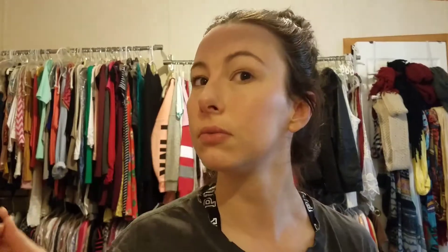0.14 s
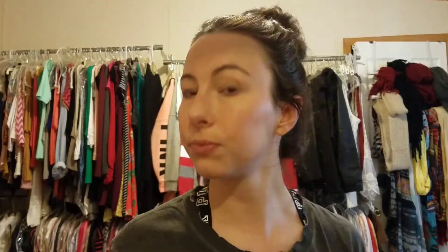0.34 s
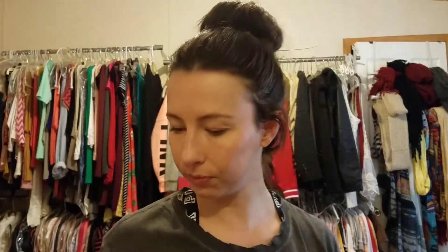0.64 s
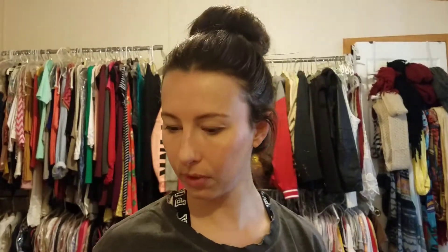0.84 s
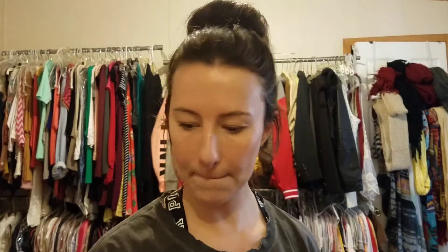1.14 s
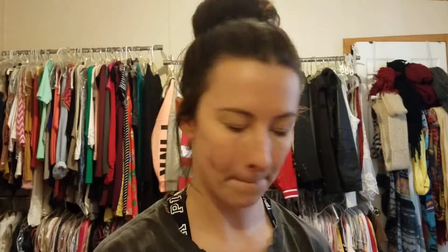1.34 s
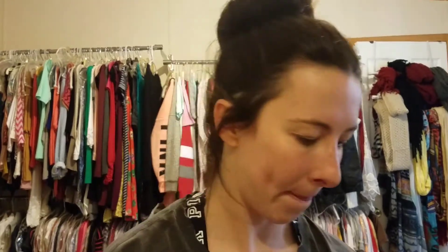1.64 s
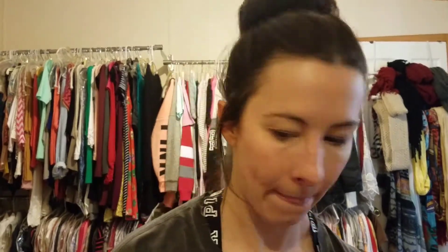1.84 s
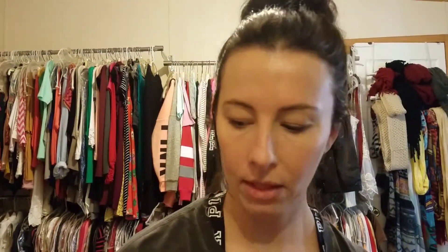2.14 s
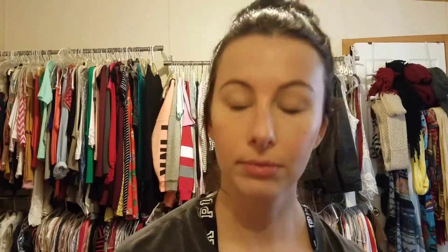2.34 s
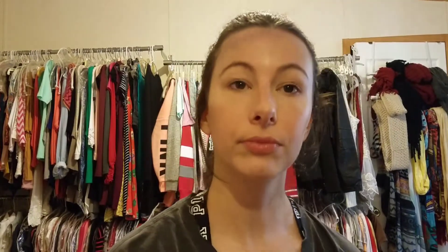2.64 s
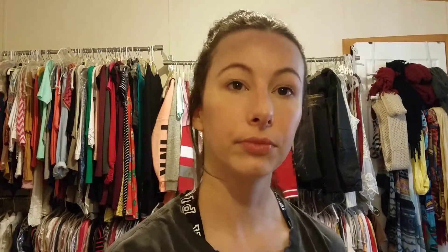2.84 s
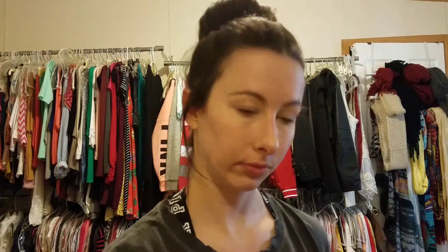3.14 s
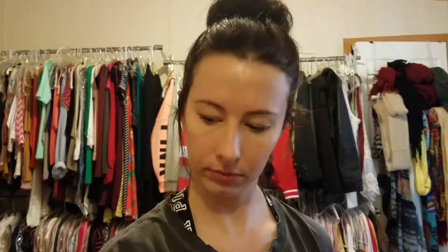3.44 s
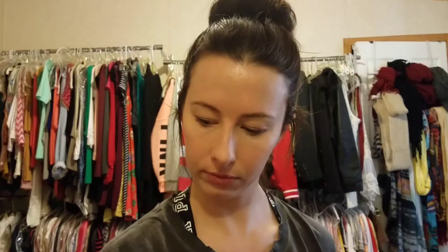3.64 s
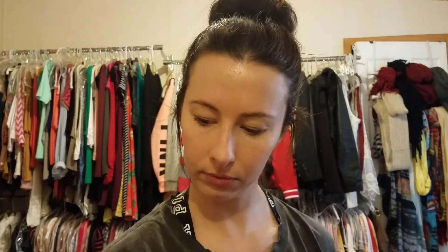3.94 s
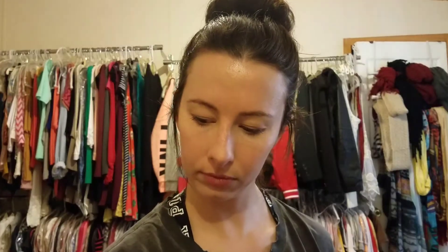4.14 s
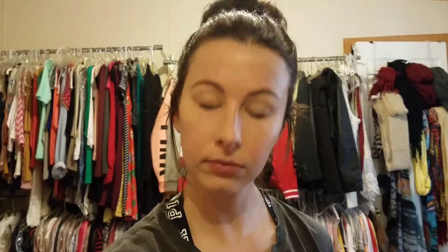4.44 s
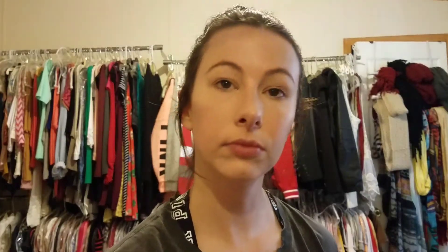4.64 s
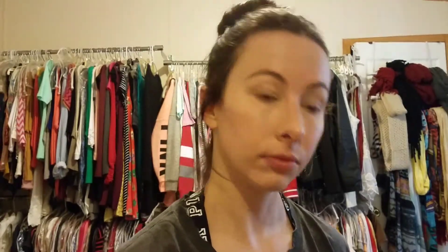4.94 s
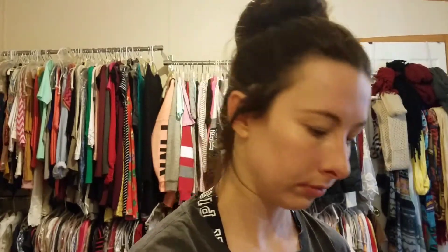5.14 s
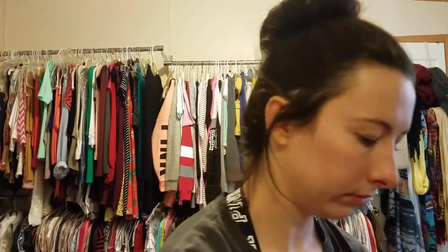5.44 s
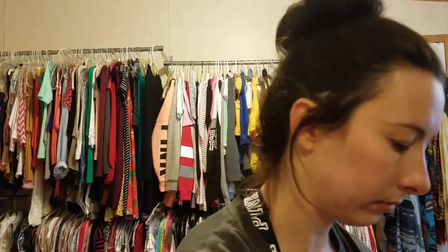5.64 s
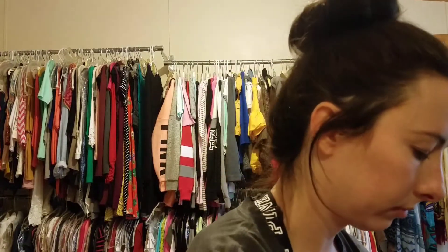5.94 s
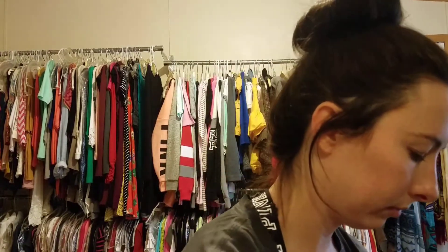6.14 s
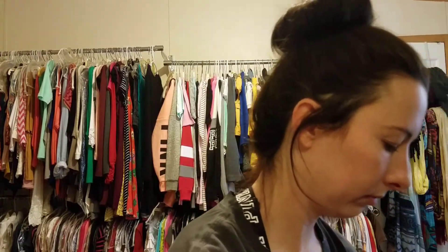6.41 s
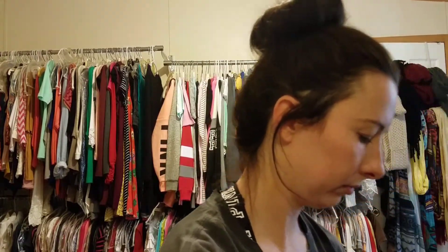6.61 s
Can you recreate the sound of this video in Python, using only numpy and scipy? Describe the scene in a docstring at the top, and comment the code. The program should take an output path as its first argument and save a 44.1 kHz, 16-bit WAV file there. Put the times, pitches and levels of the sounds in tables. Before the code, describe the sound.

Light plastic clicks and soft counter thuds over faint room hiss, then a tap, a short squeaking slide and a burst of hollow knocks.

```python
"""Low noise and hiss of a room lined with clothes come first, with hands rumbling on a wooden counter.
Small plastic make-up cases and a brush follow on the left: lids click, cases thud and slide.
After five seconds the handling moves right: a hard case taps, a slide squeaks, a hollow box is knocked.
Blows ring decaying modes; slides are dense grains or friction noise; rumble and hiss are filtered noise.
Two ports hear the handling by delay, level and shadow; the blows and slides also reverberate."""
import sys
import numpy as np
from scipy import signal
from scipy.io import wavfile

SR = 44100
rng = np.random.default_rng(int(sys.argv[2]) if len(sys.argv) > 2 else 0)


def unload_audio(sound):
    """Save the sound as a 16-bit wav file, at the path given as the first command line argument."""
    columns = np.transpose(np.atleast_2d(sound))
    # keep every value between -1 and 1, then stretch to whole-number steps
    steps = np.round(np.clip(columns, -1, 1) * 32767)
    wavfile.write(sys.argv[1], SR, steps.astype(np.int16))


N = 298557  # samples


def from_db(db):
    """Decibel law: amplitude gain of a level in dB."""
    return 10 ** (np.asarray(db) / 20)


def rms_one(x):
    """Power normalisation: scales a signal to rms 1."""
    return x / np.sqrt(np.mean(x ** 2) + 1e-20)


def in_time(rows):
    """Linear interpolation: columns of a time curve, one value per sample."""
    s, *columns = np.transpose(rows)
    return [np.interp(np.arange(N) / SR, s, c) for c in columns]


def at_hz(points, hz):
    """Logarithmic pitch: reads a spectrum on a log-frequency axis."""
    table = np.array(points)
    return np.interp(np.log(hz), np.log(table[:, 0]), table[:, 1])


def drift(rate_hz):
    """Low-passed chance: white noise through a double pole at the given rate, spread 1."""
    step = 40  # samples between drawn values
    pole = np.exp(-2 * np.pi * rate_hz * step / SR)
    white = rng.standard_normal(N // step + 2002)
    slow = signal.lfilter([1], [1, -2 * pole, pole * pole], white)[2000:]  # past the start-up
    return np.interp(np.arange(N) / step, np.arange(len(slow)), rms_one(slow))


def bands(low_hz, step=0.5916):
    """Band analysis: band-passes, step octaves wide, with their centres."""
    edges = low_hz * 2 ** np.arange(0, np.log2(.42 * SR / low_hz), step)
    return [(np.sqrt(a * b), signal.butter(2, [a, b], "band", fs=SR, output="sos"))
            for a, b in zip(edges, edges[1:])]


def train(times, db):
    """Impulsive excitation: single-sample clicks."""
    out = np.zeros(N)
    np.add.at(out, (np.asarray(times) * SR).astype(int), from_db(db))
    return out


def ring(clicks, hz, t60):
    """Damped resonance: a unit click starts a wave of height 1; zeros block 0 Hz and the top limit."""
    radius = from_db(-60 / (t60 * SR))
    angle = 2 * np.pi * hz / SR
    return signal.lfilter([.5, 0, -.5], [1, -2 * radius * np.cos(angle), radius * radius], clicks + 1e-18)


def near(hz, centre_hz, reach_oct):
    """Selective excitation: a contact favours modes around one pitch; 6 dB down at the reach."""
    return -6 * (np.log2(hz / centre_hz) / reach_oct) ** 2


TRAVEL_S = .0012  # from hands to ports


def strike(times, modes, db_of_mode, spread_db, contact_s):
    """Modal superposition: each blow rings all modes, with chance strengths and moments of contact."""
    shape = (len(times), len(modes))
    chance = spread_db * rng.standard_normal(shape)
    late = TRAVEL_S + contact_s * rng.random(shape)
    out = 0
    for k, (hz, db, t60) in enumerate(modes):
        clicks = train(times + late[:, k], db + db_of_mode(hz) + chance[:, k])
        out = out + (-1) ** k * ring(clicks, hz, t60)  # alternate modes are inverted
    return out


SLIDE_SWING_DB = 20  # rise and fall are the times over which the level moves this much


def swell(t, s, db, rise_s, fall_s):
    """Exponential growth and decay: a stroke's gain climbs, then falls, straight in dB."""
    return from_db(db - SLIDE_SWING_DB * np.maximum((s - t) / rise_s, (t - s) / fall_s))


# spectrum of the steady noise: (frequency [Hz], relative density [dB per Hz])
HISS_SPECTRUM = [(25, -15.5), (62, -9.5), (85, -7.5), (120, -4), (160, -5), (300, -13), (650, -14.5),
                 (1500, -14.5), (2250, -12), (3300, -19.5), (6300, -25), (9800, -30.5), (12800, -26.5),
                 (15500, -23)]
# coherence of the two channels: (frequency [Hz], left-right likeness [-1 to 1])
HISS_LIKENESS = [(60, 0.79), (180, 0.46), (550, 0.7), (1650, 0.23), (4970, -0.026), (15000, -0.1)]
# balance of the steady noise: (frequency [Hz], left minus right [dB])
HISS_BALANCE = [(60, 0), (240, -4), (950, 0.5), (3770, 1.5), (15000, 1)]
HISS_DB = -66.5  # rms over both channels


def hiss():
    """Interchannel coherence: steady noise, mostly alike in the bass and nearly unrelated in the treble."""
    out = 0
    white = rng.standard_normal((2, 2, N))  # neighbouring bands get unrelated noise
    for k, (hz, sos) in enumerate(bands(21.44, step=1 / 3)):
        mid, side = signal.sosfilt(sos, white[k % 2])
        alike = np.clip(at_hz(HISS_LIKENESS, hz), -1, 1)
        lean = from_db(at_hz(HISS_BALANCE, hz) / 2 * np.array([[1], [-1]]))
        pair = np.sqrt(1 + alike) * mid + np.sqrt(1 - alike) * side * [[1], [-1]]
        level = from_db(at_hz(HISS_SPECTRUM, hz) + 0.22 * drift(8.5))
        out = out + lean * level * pair
    return from_db(HISS_DB) * rms_one(out)


# hands and sleeves on the counter: (time [s], rumble level [dB])
HANDLING_LEVEL = [(0.0, -73), (0.87, -63), (1.02, -69), (1.81, -65), (2.09, -67), (2.71, -61),
                  (3.04, -67.5), (3.5, -59.5), (3.71, -75.5), (3.96, -65.5), (4.41, -61), (4.6, -66.5),
                  (5.41, -68), (5.6, -60.5), (5.79, -72.5), (6.26, -69), (6.47, -65), (6.77, -75)]
# spectrum of the rumble: (frequency [Hz], relative density [dB per Hz])
RUMBLE_SPECTRUM = [(26, -40), (45, -9.5), (62, -2), (130, 0), (166, -4), (292, -4), (440, -12.5), (519, -4),
                   (840, -21.5), (1200, -11.5), (1560, -62), (2640, -120)]
LUMPS_DB = 1.6  # spread of each of the two drifts


def handling():
    """Modulated band noise: low and lumpy, neighbouring bands swelling partly together."""
    out = 0
    together = drift(6.5)
    white = rng.standard_normal((2, N))
    for k, (hz, sos) in enumerate(bands(43.8)[:10]):
        lumps_db = LUMPS_DB * (together + drift(12))
        out = out + from_db(at_hz(RUMBLE_SPECTRUM, hz) + lumps_db) * signal.sosfilt(sos, white[k % 2])
    return from_db(in_time(HANDLING_LEVEL)[0]) * rms_one(out)


# plastic clicks: (time [s], relative level [dB], pitch most excited [Hz], crack relative to click [dB])
CASE_CLICKS = [(0.6449, -58, 2140, -29), (0.9597, -59.5, 2340, -24), (1.1552, -39.5, 2850, -9),
               (1.2282, -34.5, 1720, -14), (1.2394, -31, 2900, -6), (1.5715, -40, 2780, -2.5),
               (1.7552, -52, 2410, -8.5), (1.9227, -44.5, 2020, -15), (2.1188, -51.5, 1630, -8),
               (2.277, -65.5, 2240, 8), (2.33, -53.5, 2420, -10), (2.4304, -58, 2130, -18),
               (2.4684, -47, 2440, -24), (2.572, -57, 2160, -13), (2.6392, -47.5, 4640, -26),
               (2.731, -50.5, 1310, -20), (2.8135, -56.5, 6150, -7), (2.8469, -54, 3000, -12),
               (3.2064, -48.5, 2160, -12), (3.2226, -54, 2670, -24), (3.4369, -42, 2710, -29),
               (3.4478, -37, 4680, -32), (3.4536, -37, 3170, -28), (3.4934, -64, 4520, -21),
               (3.908, -41, 2770, -6.5), (3.9588, -38.5, 2320, -31), (3.9674, -41, 2580, -19),
               (3.9785, -29.5, 2920, -11), (4.1896, -59, 4200, -7), (4.33, -56, 2740, -19),
               (4.343, -56, 3030, -19), (4.3795, -52, 1980, -14), (4.4006, -53, 2950, -27),
               (4.4317, -52, 2100, -23), (4.5391, -60, 2600, -20), (4.575, -43.5, 2480, -33),
               (5.4969, -60, 3650, -20), (5.5149, -53, 1780, -23), (5.5815, -48, 1410, -14),
               (5.8146, -50, 1290, -28), (6.247, -55, 3000, -9)]
# ringing of the plastic cases: (frequency [Hz], relative level [dB], t60 before the cap [s])
CASE_MODES = [(1220, 10, 0.012), (1540, 3, 0.027), (1817, 9, 0.0053), (2310, 4.5, 0.011),
              (2682, 2.5, 0.018), (3265, 10, 0.005), (3730, 9.5, 0.0067), (4040, 9.5, 0.0085),
              (4730, 7.5, 0.0092), (5710, 7.5, 0.0063), (6740, 4, 0.036), (7430, 4, 0.045),
              (7500, -18, 0.036)]
CASE_LONGEST_T60_S, CASE_CONTACT_S = .022, .0008
CASE_REACH_OCT, CASE_SPREAD_DB = 0.73, 2
CASE_DB, CRACK_DB = -6, 3  # added to every ringing and every crack
CRACK_S = 0.0072  # time in which the crack's amplitude falls to 1/e
CRACK_LOW_HZ, CRACK_HIGH_HZ = 5950, 8400


def cases():
    """Modal decay plus a noise burst: plastic lids ring in short modes with a bright crack."""
    s, db, hz, crack_db = np.transpose(CASE_CLICKS)
    modes = [(f, level, min(t60, CASE_LONGEST_T60_S)) for f, level, t60 in CASE_MODES]
    body = strike(s, modes, lambda f: db + CASE_DB + near(f, hz, CASE_REACH_OCT),
                  CASE_SPREAD_DB, CASE_CONTACT_S)
    fade = np.exp(-1 / (CRACK_S * SR))
    onsets = train(s + TRAVEL_S, db + crack_db + CRACK_DB)
    burst = rng.choice([-1, 1], N) * signal.lfilter([1], [1, -fade], onsets + 1e-18)
    bright = signal.butter(1, (CRACK_LOW_HZ, CRACK_HIGH_HZ), "band", fs=SR, output="sos")
    return body + signal.sosfilt(bright, burst)


# two small ticks straight ahead: (time [s], level added to the modes [dB])
TICK_BLOWS = [(0.826, -70), (3.008, -66.5)]
# their ringing: (frequency [Hz], relative level [dB], t60 [s])
TICK_MODES = [(1116, 18.5, 0.025), (1560, -14, 0.013), (2250, 10, 0.044)]


def ticks():
    """Modal decay: two faint ticks ahead, each ringing three modes."""
    s, db = np.transpose(TICK_BLOWS)
    return strike(s, TICK_MODES, lambda f: db, 0.91, CASE_CONTACT_S)


# thuds, on the counter and, from 6.44 s, on the hollow box: (time [s], relative level [dB], pitch most excited
# [Hz])
COUNTER_THUDS = [(1.228, -26.5, 506), (1.24, -26.5, 516), (1.26, -39, 526), (1.285, -41, 480),
                 (1.487, -53, 145), (1.636, -51, 230), (1.754, -48.5, 480), (1.767, -45, 299),
                 (1.778, -44, 199), (1.921, -50, 428), (2.116, -45, 500), (2.131, -52.5, 375),
                 (2.555, -50, 213), (2.62, -59, 113), (2.689, -44, 123), (2.847, -43, 273),
                 (3.361, -33, 114), (3.376, -38, 114), (3.443, -49, 500), (3.488, -43.5, 260),
                 (3.958, -28, 443), (3.979, -35, 300), (4.189, -49, 286), (4.23, -47.5, 244),
                 (4.328, -37, 310), (4.434, -50.5, 600), (4.484, -50, 120), (4.576, -47.5, 209),
                 (5.439, -51.5, 143), (5.498, -44, 266), (5.52, -43, 280), (5.582, -46, 716),
                 (5.794, -42, 141), (5.818, -42, 143), (5.838, -42, 130), (6.386, -33.5, 400),
                 (6.448, -41.5, 440), (6.484, -35.5, 430), (6.531, -39.5, 380)]
# ringing of the counter: (frequency [Hz], relative level [dB], t60 [s])
COUNTER_MODES = [(127.5, -2.5, 0.29), (197, 0.5, 0.055), (296.2, 1.5, 0.1), (360, -15, 0.04),
                 (447, -3.5, 0.081), (540.6, 7.5, 0.045), (643, 2, 0.04), (844, 5, 0.027),
                 (1050, -4, 0.033)]
COUNTER_REACH_OCT, COUNTER_SPREAD_DB = 0.94, 2.5
COUNTER_DB, COUNTER_CONTACT_S = -10.5, .002


def counter():
    """Contact softness: blows ring the low modes of the wood, and a soft contact has little treble."""
    s, db, hz = np.transpose(COUNTER_THUDS)
    blows = strike(s, COUNTER_MODES, lambda f: db + COUNTER_DB + near(f, hz, COUNTER_REACH_OCT),
                   COUNTER_SPREAD_DB, COUNTER_CONTACT_S)
    return signal.sosfilt(signal.butter(2, 1100, fs=SR, output="sos"), blows)


# things slide and jostle: (time of maximum [s], relative level [dB], rise [s], fall [s],
# pitch most excited [Hz], all pitches relative to it [dB])
SLIDE_STROKES = [(1.244, -51, .002, 0.0054, 2190, -5), (1.3, -77, .03, .03, 2000, -6),
                 (1.764, -73, .006, 0.075, 2400, -7), (1.93, -70, 0.0044, 0.034, 3800, -10),
                 (2.121, -70, .002, 0.02, 1900, -13), (2.5, -80, .005, .02, 1910, -2),
                 (2.578, -73, .015, .03, 2030, -12), (2.625, -72, .02, .02, 1250, -20),
                 (2.646, -74, 0.044, .1, 2580, -9), (2.685, -69, .03, .025, 1100, -20),
                 (2.728, -69, .02, .025, 1400, -18), (2.852, -79.5, 0.064, 0.019, 2400, 3),
                 (3.452, -55.5, 0.027, 0.013, 3400, -13), (3.485, -65.5, 0.017, 0.024, 3380, -1.5),
                 (3.984, -47.5, 0.015, .005, 2680, -14), (4.03, -72, .05, .05, 2720, -21),
                 (4.344, -69, .045, 0.022, 1880, -7), (4.398, -83, 0.072, .1, 2600, 0),
                 (5.442, -60, 0.027, .05, 1210, -36), (5.5, -74, .02, .01, 1310, -7),
                 (5.584, -73, .002, 0.057, 1470, 4), (5.788, -63.5, .015, .03, 1040, -25),
                 (5.816, -69.5, 0.012, .035, 1130, -8.5), (5.92, -61, 0.045, 0.038, 1200, -12.5),
                 (6.35, -53, .02, 0.1, 2480, -34), (6.393, -49, 0.0124, 0.12, 2180, -15),
                 (6.493, -68, 0.054, 0.056, 2330, -34), (6.539, -55.5, 0.041, 0.053, 1750, -19.5)]
SLIDE_GRAINS_PER_S, GRAIN_SPREAD_DB = 1200, 4.5
SLIDE_CYCLES = 18.6  # cycles within a grain's t60
SLIDE_REACH_OCT = 0.46


def slides():
    """Granular friction: dense uneven grains ring briefly, strongest round one pitch, weaker at all."""
    s, db, rise_s, fall_s, centre, broad_db = np.transpose(SLIDE_STROKES)
    t = np.arange(0, N, 16) / SR  # a coarse grid is enough for the levels
    strokes = swell(t[:, None], s, db, rise_s, fall_s)
    out = 0
    for hz in np.geomspace(500, 14000, 20):
        sizes_db = GRAIN_SPREAD_DB * np.minimum(rng.exponential(1, N), 4)
        sizes = from_db(sizes_db) * rng.choice([-1, 1], N)
        grains = sizes * (rng.random(N) < SLIDE_GRAINS_PER_S / SR)
        level = strokes @ (from_db(near(hz, centre, SLIDE_REACH_OCT)) + from_db(broad_db))
        ringing = rms_one(ring(grains, hz, SLIDE_CYCLES / hz))
        out = out + ringing * np.interp(np.arange(N) / SR, t, level)
    return out


# a small hard case is set down and bounces once: (time [s], level added to the modes [dB])
TAP_BLOWS = [(5.5812, -45), (5.6004, -53.5)]
# its ringing: (frequency [Hz], relative level [dB], t60 [s])
TAP_MODES = [(678, -4.5, 0.11), (1526, 5, 0.053), (2140, -15, 0.022), (3550, -9.5, 0.043)]


def taps():
    """Low damping: the hard case's longest modes outlast those of the lids."""
    s, db = np.transpose(TAP_BLOWS)
    return strike(s, TAP_MODES, lambda f: db, 1, CASE_CONTACT_S)


# a squeaking slide: (time of maximum [s], level added to the resonances [dB], rise [s], fall [s])
SQUEAK_STROKE = (6.272, -53.5, .012, 0.14)
# its resonances: (frequency [Hz], relative level [dB], t60 [s])
SQUEAK_RESONANCES = [(3010, 0.5, 0.017), (4200, -2, 0.0036), (6180, -12, 0.0025)]


def squeak():
    """Source and filter: rough friction noise passes through a few resonances."""
    rub = rng.standard_normal(N) * from_db(4.8 * drift(96))
    tone = sum(from_db(db) * rms_one(ring(rub, hz, t60)) for hz, db, t60 in SQUEAK_RESONANCES)
    return tone * swell(np.arange(N) / SR, *SQUEAK_STROKE)


# knocks on the hollow box: (time [s], relative level [dB], upper modes relative to the lower [dB])
BOX_KNOCKS = [(6.332, -23, -7), (6.346, -37, -4), (6.353, -22, -6), (6.364, -28, -43), (6.371, -30, 1),
              (6.385, -12.5, 1), (6.4, -34, -1), (6.411, -20.5, -6.5), (6.425, -25, -9), (6.433, -34, 2.5),
              (6.448, -29.5, -17), (6.477, -26.5, -17), (6.485, -18, -15.5), (6.504, -20, -30),
              (6.533, -30, -11), (6.552, -37, -11)]
# ringing of the box: (frequency [Hz], relative level [dB], t60 [s])
BOX_MODES = [(443, -18, 0.04), (600, -9, 0.038), (637, -2, 0.047), (682, -4, 0.04), (797, -12.5, 0.026),
             (1120, -13.5, 0.034), (1550, 2.5, 0.018), (1826, 5, 0.018), (2016, 4.5, 0.027),
             (2314, -0.5, 0.05), (2660, 4.5, 0.019), (2918, -1.5, 0.044), (2985, 3.5, 0.027),
             (4060, 4, 0.0089), (4610, 0.5, 0.019), (6370, -13, 0.027)]
BOX_UPPER_HZ = 1300  # modes above this are the upper ones
BOX_DB, BOX_SPREAD_DB, BOX_CONTACT_S = -10.5, 2.5, .0015


def box():
    """Contact hardness: harder knocks reach the upper modes of the box more."""
    s, db, upper_db = np.transpose(BOX_KNOCKS)
    knocks = strike(s, BOX_MODES, lambda f: db + BOX_DB + upper_db * (f > BOX_UPPER_HZ),
                    BOX_SPREAD_DB, BOX_CONTACT_S)
    return signal.sosfilt(signal.butter(1, 5000, fs=SR, output="sos"), knocks)


# where the hands are: (time [s], lag of the left port [samples], left minus right [dB])
HAND_PLACE = [(0, -15, 3), (5.0, -15, 3), (5.3, 14, -3), (6.77, 14, -3)]
SHADOW_HZ = 4340  # low-pass of the shaded port


def ports(x):
    """Interaural-style cues: the near port hears earlier and louder; the housing dulls the far one."""
    lag, db = in_time(HAND_PLACE)
    dull = signal.sosfilt(signal.butter(1, SHADOW_HZ, fs=SR, output="sos"), x)
    out = []
    for sign in (1, -1):  # left, right
        shade = np.clip(-sign * db / 3, 0, 1)  # full shadow at 3 dB
        delay = np.round(sign * lag / 2).astype(int)
        heard = np.clip(np.arange(N) - delay, 0, N - 1)
        out.append(from_db(sign * db / 2) * (shade * dull + (1 - shade) * x)[heard])
    return np.array(out)


# reverberation time of the room: (frequency [Hz], t60 [s])
ROOM_DECAY = [(150, 0.26), (600, 0.17), (2500, 0.18), (8000, 0.19)]
# colour of the reflections: (frequency [Hz], relative level [dB])
ROOM_SPECTRUM = [(150, -5), (600, 3), (2500, -5), (8000, -1.5)]
ROOM_DB, ROOM_GAP_S = -6.5, 0.0027  # tail energy, silence before the first reflection


def room(x):
    """Diffuse reverberation: reflections are noise dying band by band, unrelated between channels."""
    t = np.arange(SR // 2) / SR
    white = rng.standard_normal((2, 2, len(t)))  # neighbouring bands get unrelated noise
    tail = 0
    for k, (hz, sos) in enumerate(bands(59.3)):
        level_db = at_hz(ROOM_SPECTRUM, hz) - 60 * t / at_hz(ROOM_DECAY, hz)
        tail = tail + signal.sosfilt(sos, white[k % 2]) * from_db(level_db)
    tail = tail * (t > ROOM_GAP_S)
    tail = tail / np.sqrt(np.sum(tail ** 2) / 2)  # mean energy 1 per channel
    return from_db(ROOM_DB) * signal.fftconvolve(x[None], tail, axes=1)[:, :N]


def scene():
    """Linear superposition: sounds aside and ahead, their reverberation, and the hiss add up."""
    aside = cases() + counter() + box() + taps() + slides() + squeak()
    ahead = ticks()
    return ports(aside + handling()) + ahead + room(aside + ahead) + hiss()


def record(dry):
    """Band limitation: a steep low-pass removes the top of the spectrum."""
    cutoff_hz = 16500  # 60 dB down from here up
    return signal.sosfilt(signal.cheby2(12, 60, cutoff_hz, fs=SR, output="sos"), dry)


dry = scene()
out = record(dry)
unload_audio(out)
```